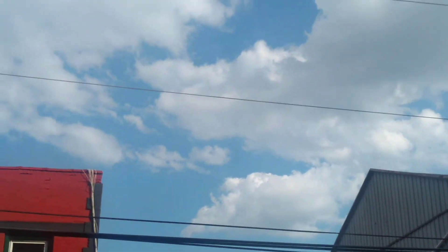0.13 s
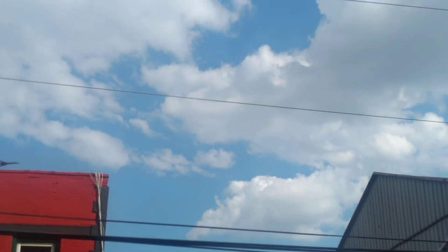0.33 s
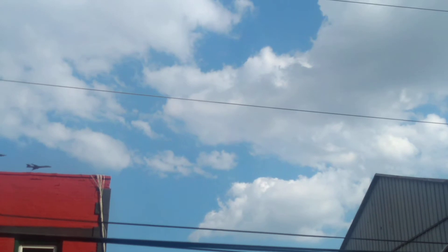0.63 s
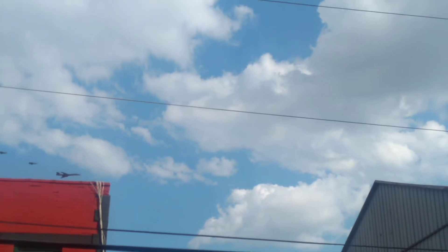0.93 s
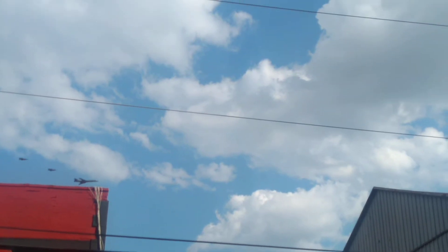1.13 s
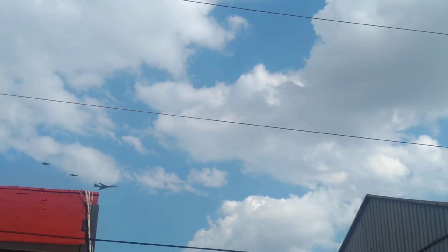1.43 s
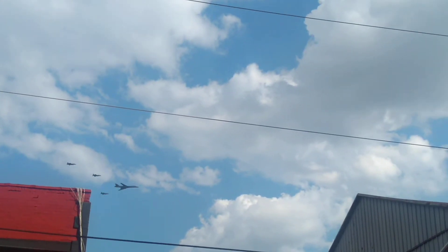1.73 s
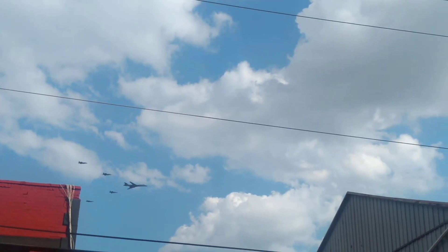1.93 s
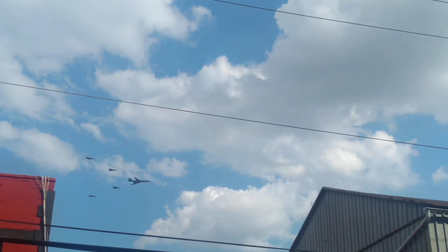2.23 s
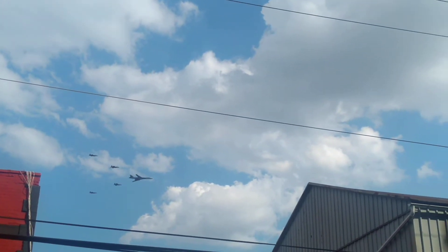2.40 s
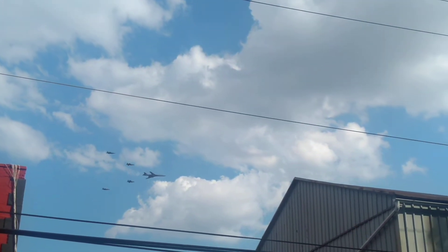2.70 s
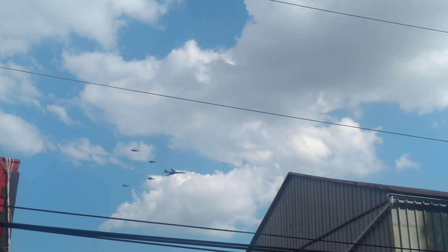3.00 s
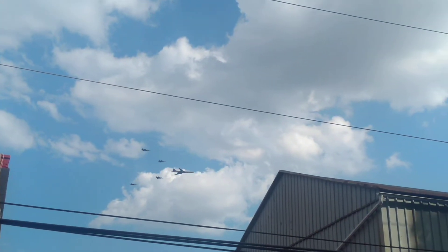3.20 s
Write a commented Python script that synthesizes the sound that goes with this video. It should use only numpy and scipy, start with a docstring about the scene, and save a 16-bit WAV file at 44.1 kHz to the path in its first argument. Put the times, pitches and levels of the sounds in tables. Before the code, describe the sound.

Deep, gusty roar of a distant jet formation outdoors between buildings, faint turbine whines surfacing and sagging, the roar swelling strongest past two seconds, then easing; wide stereo camera microphone with very faint hiss.

```python
"""A yard between buildings, with a formation of jets passing far off, heard on a two-port camera microphone.
Their exhaust roar is noise swelling in gusts through moving air, combed by an echo off the ground;
turbine whines surface briefly as wavering tones, most of them sagging in pitch.
Brief treble swells and one tiny tick lie over it, on the microphone's own patchy hiss.
The image drifts to the left, and a delayed cross-feed between the channels widens it."""
import sys
import numpy as np
from scipy import signal
from scipy.fft import rfft, irfft, next_fast_len
from scipy.io import wavfile

SR = 44100
rng = np.random.default_rng(int(sys.argv[2]) if len(sys.argv) > 2 else 0)


def log_audio(samples):
    """Write samples as a 16-bit WAV file to the path given in sys.argv[1]."""
    # one column per channel
    frames = np.atleast_2d(samples).T
    # limit to full scale, then quantise
    limited = np.clip(frames, -1, 1)
    pcm = np.round(limited * 32767).astype(np.int16)
    wavfile.write(sys.argv[1], SR, pcm)


N = 147735
SIZE = next_fast_len(N + 2048)  # transform length, samples
HZ = np.maximum(np.arange(SIZE // 2 + 1) * SR / SIZE, 1)


def amp(db):
    """dB to gain."""
    return 10 ** (np.asarray(db) / 20)


def rms_one(x):
    """Scale to rms 1."""
    return x / np.sqrt(np.mean(x ** 2))


def in_time(rows):
    """Columns of a table at every sample."""
    s, *columns = np.transpose(rows)
    return np.array([np.interp(np.arange(N) / SR, s, c) for c in columns])


def in_hz(rows):
    """Columns of a table at every frequency, joined along log frequency."""
    hz, *columns = np.transpose(rows)
    return [np.interp(np.log(HZ), np.log(hz), c) for c in columns]


def drift(corner_hz):
    """Random wandering of spread 1: low-passed noise, made at every 40th sample and joined up."""
    r = np.exp(-2 * np.pi * corner_hz * 40 / SR)
    noise = rng.standard_normal(N // 40 + 2002)
    slow = signal.lfilter([1], [1, -2 * r, r * r], noise)[2000:]  # drop the filter's start
    return np.interp(np.arange(N) / 40, np.arange(len(slow)), rms_one(slow))


def half_octave_share(octave, centre):
    """Raised-cosine band around a centre in octaves; neighbours half an octave apart sum to 1."""
    return np.cos(np.pi * np.clip(octave - centre, -.5, .5)) ** 2


# How the distant jets meet the two microphone ports:
# (frequency [Hz], phase lead of right [rad], left minus right [dB], likeness of the ports [0-1])
PORT_MEETING = [(30, 0, -1.5, .72), (80, 0, .2, .78), (150, -.05, -.8, .88), (300, .1, -1.2, .88),
                (500, .35, -1.5, .85), (1000, .6, 1, .87), (1300, 1.8, 4, .35), (1600, 3.4, 4.5, .75),
                (2100, 4.6, 6.5, .7), (2700, 6.3, 5, .8), (3100, 8, 3, .55), (3400, 8.2, -1, .45),
                (4000, 9.3, 0, .5), (5000, 11, 0, .2)]


def at_ports(near, other):
    """Spectra at the left and right port from a sound and an unrelated twin."""
    lead, balance_db, alike = in_hz(PORT_MEETING)
    alike = np.clip(alike, 0, 1)
    right = (alike * near + np.sqrt(1 - alike ** 2) * other) * np.exp(1j * lead)
    return np.array([near * amp(balance_db / 2), right * amp(-balance_db / 2)])


GROUND_ECHO_S, GROUND_SHARE, GROUND_CUT_HZ = 0.003096, 0.34, 910
ECHO_REPEAT_SHARE = 0.23  # second arrival, between the walls, relative to the first squared over its share


def ground_echo():
    """Delayed bounce off the ground, duller than the direct sound, coming round again between the walls."""
    echo = GROUND_SHARE * np.exp(-HZ / GROUND_CUT_HZ - 2j * np.pi * HZ * GROUND_ECHO_S)
    return echo + ECHO_REPEAT_SHARE * echo ** 2 / GROUND_SHARE


# Gusts of the far roar, in tables by region: rumble; body, upper body, edge and top; bite.
# Only the changes within each level column are heard.
# Rumble: (time [s], level [dB])
RUMBLE_GUSTS = [(0.03, -29), (0.05, -33.5), (0.96, -31.5), (0.98, -35.5), (1.21, -29.5), (1.23, -35),
                (1.31, -29.5), (1.33, -33.5), (2.57, -32), (2.87, -33.5), (3.09, -31.5), (3.33, -33.5)]
# Body to top: (time [s], body level [dB], upper body level [dB], edge level [dB], top level [dB])
ROAR_GUSTS = [(0.03, -35.5, -39, -48, -74), (0.17, -33.5, -40, -52, -70.5), (0.3, -33.5, -42.5, -50, -66.5),
              (0.32, -35, -44, -53.5, -70), (0.51, -32, -34.5, -48, -62.5), (0.64, -34, -40, -51, -66),
              (0.74, -32, -40, -46.5, -68), (0.79, -33.5, -33, -44, -63), (0.84, -29.5, -29, -40.5, -64),
              (0.9, -32, -34.5, -46, -64.5), (0.98, -33, -34.5, -50.5, -67.5),
              (0.99, -27.5, -35.5, -46, -61), (1.04, -31.5, -32, -44.5, -69),
              (1.06, -31.5, -30.5, -51, -59), (1.11, -31, -38.5, -49, -65.5), (1.13, -30.5, -32, -43, -64),
              (1.24, -34.5, -35, -50.5, -64), (1.32, -31, -37, -48, -64), (1.41, -30.5, -36, -47, -64.5),
              (1.55, -32, -36, -48.5, -65), (1.7, -32, -36, -50, -64.5), (1.73, -35, -41.5, -51, -66),
              (1.95, -28, -31.5, -45.5, -63), (2.0, -26, -30, -44, -58.5), (2.1, -27.5, -32, -51.5, -62.5),
              (2.12, -24, -38, -46.5, -62), (2.19, -26.5, -28, -39, -54.5), (2.28, -26, -32.5, -45.5, -62),
              (2.32, -24, -26.5, -44.5, -57), (2.41, -27, -30.5, -44.5, -61),
              (2.46, -27, -31.5, -43.5, -52), (2.48, -21.5, -24.5, -41.5, -59),
              (2.52, -25, -26.5, -43.5, -53), (2.54, -20.5, -22.5, -40, -56),
              (2.64, -24, -27.5, -43, -57.5), (2.67, -26, -33, -47, -62),
              (2.71, -27.5, -34.5, -46.5, -64.5), (2.86, -31, -37, -50.5, -57),
              (2.89, -26, -30.5, -43, -57), (2.95, -30.5, -36.5, -45.5, -61.5),
              (3.12, -28, -32, -42.5, -53), (3.15, -35, -34.5, -44.5, -64), (3.26, -31.5, -36.5, -50, -58),
              (3.33, -34, -35.5, -48, -62)]
# Bite, between upper body and edge: (time [s], level [dB])
BITE_GUSTS = [(0.0, -53), (0.02, -49), (1.27, -41), (1.86, -41), (2.02, -31), (2.12, -38), (2.37, -34),
              (2.42, -37), (2.44, -34), (2.47, -39.5), (2.55, -28.5), (2.57, -34), (2.79, -37),
              (2.82, -31.5), (2.84, -38), (3.1, -38), (3.31, -42.5), (3.33, -37.5)]


def gusts_db():
    """Level of the six regions as moving air lets the roar through, each around its own rms of 0 dB."""
    body, upper, edge, top = in_time(ROAR_GUSTS)
    swell = amp(np.vstack([in_time(RUMBLE_GUSTS), body, upper, in_time(BITE_GUSTS), edge, top]))
    return 20 * np.log10(swell / np.sqrt(np.mean(swell ** 2, axis=1, keepdims=True)))


# Centres of rumble, body, upper body, bite, edge and top: (frequency [Hz])
GUST_REGION_HZ = [250, 650, 1020, 1450, 2050, 3450]
# Colour of the distant roar, relative: (frequency [Hz], level per Hz [dB])
EXHAUST_COLOUR = [(25, -44), (45, -22), (65, -10), (100, -4), (170, 1.5), (280, -1.5), (460, -6),
                  (650, -5.5), (800, -9), (1000, -12.5), (1300, -13.5), (1500, -14), (2200, -18.5),
                  (2800, -28), (3300, -35), (3800, -43.5), (4300, -62), (5000, -61), (8000, -93.5)]
ROAR_DB = -24  # direct sound, before flicker and echo
SHARED_FLICKER_DB, OWN_FLICKER_DB, FLICKER_CORNER_HZ = 0.19, 0.72, 23
ECHO_FOLLOWS = 0.28  # the echo stands out more as the roar swells (dB per dB)


def roar():
    """Exhaust noise with its ground echo, in half-octave bands that swell with their region and flicker."""
    echo = ground_echo()
    spectra = at_ports(*rfft(rng.standard_normal((2, SIZE)))) * amp(in_hz(EXHAUST_COLOUR)[0])
    spectra = spectra / np.sqrt(np.mean(irfft(spectra, SIZE) ** 2))
    swell_db = gusts_db()
    centres = np.arange(5, 13, .5)  # log2 of Hz
    octave = np.clip(np.log2(HZ), centres[0], centres[-1])
    together = drift(FLICKER_CORNER_HZ)
    out = 0
    for centre in centres:
        # blend the two gust regions nearest this band
        place = np.interp(centre, np.log2(GUST_REGION_HZ), np.arange(len(GUST_REGION_HZ)))
        low = min(int(place), len(GUST_REGION_HZ) - 2)
        level_db = (low + 1 - place) * swell_db[low] + (place - low) * swell_db[low + 1]
        flicker_db = SHARED_FLICKER_DB * together + OWN_FLICKER_DB * drift(FLICKER_CORNER_HZ)
        band = spectra * half_octave_share(octave, centre)
        direct, bounced = irfft([band, band * echo], SIZE)[..., :N]
        echo_gain = np.minimum(amp(ECHO_FOLLOWS * level_db), 2)
        out = out + amp(level_db + flicker_db) * (direct + echo_gain * bounced)
    return amp(ROAR_DB) * out


# Distant turbine whines surfacing; level is the tone's peak before flutter and the ports:
# (start [s], length [s], pitch [Hz], droop by the end [Hz], level [dB])
TURBINE_WHINES = [(.08, .19, 2880, 20, -59), (.34, .06, 2860, 10, -55), (.39, .09, 2865, 70, -47.5),
                  (.91, .15, 3120, 0, -51), (1.05, .145, 3140, 90, -46.5), (1.19, .11, 3110, 85, -49.5),
                  (1.35, .08, 2590, 0, -54), (1.44, .16, 2560, 15, -54), (1.51, .1, 3015, -15, -56),
                  (1.61, .06, 2750, 80, -44), (1.79, .09, 2750, 0, -51), (1.85, .09, 2745, 50, -43),
                  (2.095, .085, 2520, 10, -45.5), (2.385, .06, 2600, -40, -41), (2.44, .04, 2440, 0, -45)]
WAVER_HZ, FLUTTER_DB = 13, 4.5  # spread of pitch and of level
RISE_SHARE, FALL_S = .3, .025  # fade-in as a share of the length, fade-out time


def whines():
    """Each is a fluttering, wavering tone that fades in; most sag, fastest at the end, some hold or rise."""
    t, tone = np.arange(N) / SR, np.zeros(SIZE)
    waver, flutter_db = WAVER_HZ * drift(27), FLUTTER_DB * drift(45)
    for start, length, hz, droop_hz, db in TURBINE_WHINES:
        rise = (t - start) / (RISE_SHARE * length)
        fall = (start + length - t) / FALL_S
        shape = np.clip(np.minimum(rise, fall), 0, 1)
        pitch = hz - droop_hz * np.clip((t - start) / length, 0, 1) ** 2 + waver
        tone[:N] += amp(db + flutter_db) * shape * np.sin(2 * np.pi * np.cumsum(pitch) / SR)
    return irfft(at_ports(rfft(tone), 0), SIZE)[:, :N]


# Brief swells of the treble; level is at the crest, before flicker:
# (start [s], length [s], centre [Hz], level [dB])
TREBLE_SWELLS = [(2.47, 0.22, 4900, -69.5), (2.8, 0.15, 6300, -68.5), (3.22, 0.18, 5200, -69)]
SWELL_OCTAVES, SWELL_FLICKER_DB = .28, 2  # distance from the centre where gain is 1/e, flicker spread


def treble_swells():
    """Short flickering swells of narrow noise, unrelated in the two channels."""
    t, out, white = np.arange(N) / SR, 0, rfft(rng.standard_normal((2, SIZE)))
    flicker_db = SWELL_FLICKER_DB * drift(25)
    for start, length, hz, db in TREBLE_SWELLS:
        narrow = np.exp(-(np.log2(HZ / hz) / SWELL_OCTAVES) ** 2)
        band = rms_one(irfft(white * narrow, SIZE)[:, :N])
        shape = np.abs(np.sin(np.pi * np.clip((t - start) / length, 0, 1))) ** .5
        out = out + amp(db + flicker_db) * shape * band
    return out


TICK_S, TICK_DB, TICK_FROM_HZ = 2.4222, -51, 3500  # level before the high-pass
TICK_PAN_DB = -3  # left minus right
RING_HZ, RING_DB, RING_T60_S = 12600, -7, .005  # ring level relative to the click


def tick():
    """One tiny tick close to the microphone: a high-passed click with a very short high ring."""
    click = amp(TICK_DB) * (np.arange(N) == int(TICK_S * SR)) + 1e-18  # offset keeps the filters quick
    r, w = amp(-60 / (RING_T60_S * SR)), 2 * np.pi * RING_HZ / SR
    ring = signal.lfilter([0, np.sin(w)], [1, -2 * r * np.cos(w), r * r], click)
    bare = signal.lfilter(*signal.butter(2, TICK_FROM_HZ, "high", fs=SR), click)
    return (bare + amp(RING_DB) * ring) * amp([[TICK_PAN_DB / 2], [-TICK_PAN_DB / 2]])


# Colour of the microphone's hiss, relative, before a gentle low cut: (frequency [Hz], level per Hz [dB])
MICROPHONE_HISS_COLOUR = [(2500, -7), (4500, 1.5), (7000, -0.5), (9000, -2), (11000, -10.5), (14000, -16)]
HISS_DB, HISS_PATCHY_DB = -69, 2  # rms level, spread of each band's level


def hiss():
    """The microphone's faint treble noise, separate in each channel, in bands of wandering level."""
    white = rfft(rng.standard_normal((2, SIZE)))
    spectra = white * amp(in_hz(MICROPHONE_HISS_COLOUR)[0]) * HZ / (HZ + 2000)
    octave, out = np.clip(np.log2(HZ), 11, 14), 0
    for centre in np.arange(11, 14.5, .5):  # log2 of Hz
        band = irfft(spectra * half_octave_share(octave, centre), SIZE)[:, :N]
        out = out + amp(HISS_PATCHY_DB * drift(18)) * band
    return amp(HISS_DB) * rms_one(out)


LEFTWARD_DB_PER_S = .5  # left gains on right as the camera turns


def scene():
    """Far roar and whines drifting to the left, then treble swells, the close tick and hiss."""
    turn_db = LEFTWARD_DB_PER_S * (np.arange(N) - N / 2) / SR / 2
    jets = (roar() + whines()) * amp([turn_db, -turn_db])
    return jets + treble_swells() + tick() + hiss()


# Each microphone channel loses a delayed copy of the other, share held to 0.97 at most:
# (frequency [Hz], share [0-1])
WIDENING = [(50, 0.15), (1000, 0.54), (2000, 0.69), (3200, 0.86), (4200, 1), (5200, 0.9), (6300, .48),
            (7400, 0.7), (8400, .17), (11000, 0.1)]
CROSSFEED_S = 21 / 44100
STOP_HZ = 14805  # everything above is at least 70 dB down


def record(dry):
    """The camera microphone: widening by subtracted cross-feed, then a steep cut of the top."""
    spectra = rfft(dry, SIZE)
    share = np.clip(in_hz(WIDENING)[0], 0, .97)
    crossed = share * np.exp(-2j * np.pi * HZ * CROSSFEED_S) * spectra[::-1]
    wide = irfft(spectra - crossed, SIZE)[:, :N]
    return signal.sosfilt(signal.cheby2(14, 70, STOP_HZ, fs=SR, output="sos"), wide)


dry = scene()
out = record(dry)
log_audio(out)
```